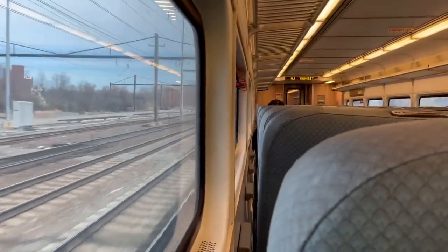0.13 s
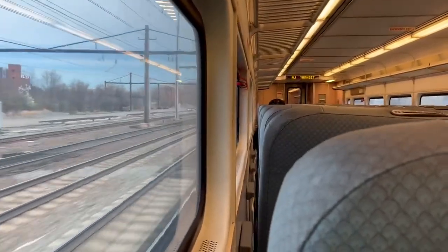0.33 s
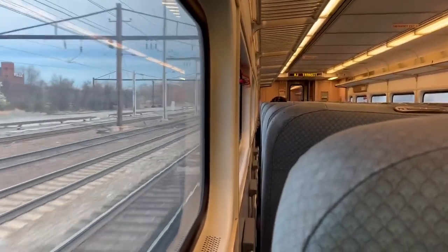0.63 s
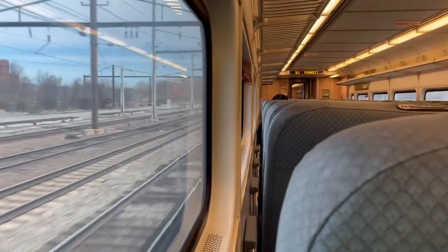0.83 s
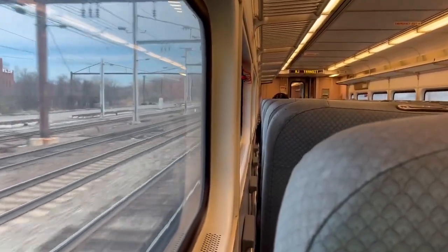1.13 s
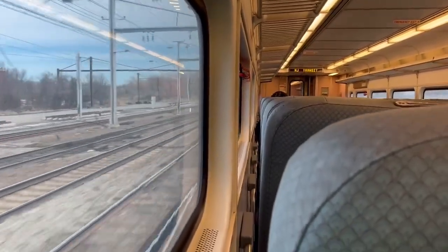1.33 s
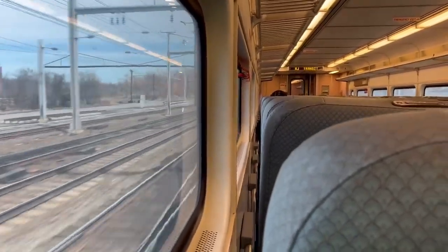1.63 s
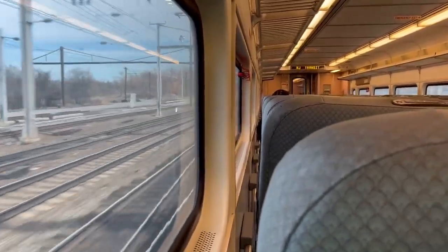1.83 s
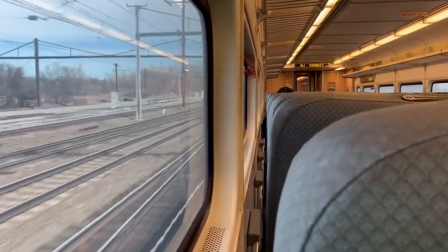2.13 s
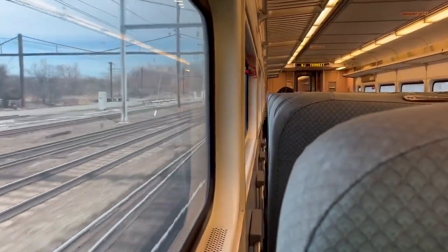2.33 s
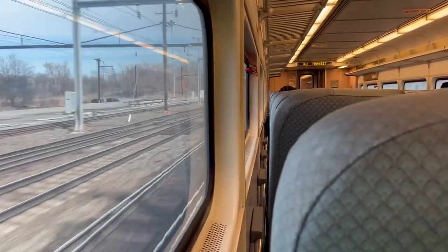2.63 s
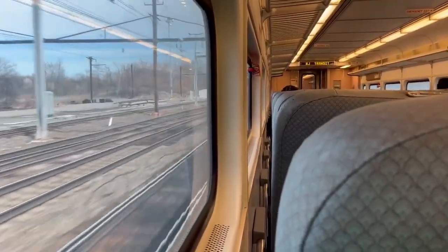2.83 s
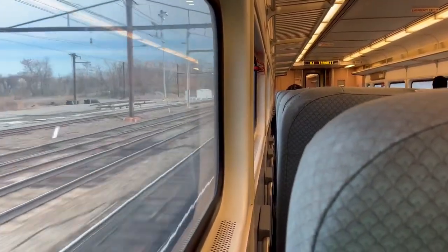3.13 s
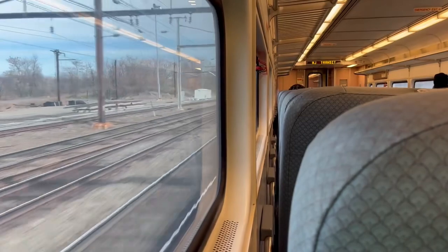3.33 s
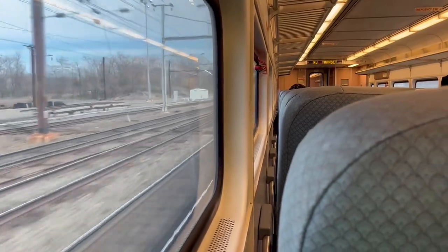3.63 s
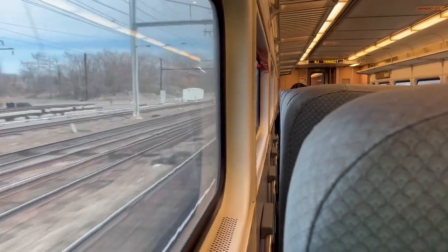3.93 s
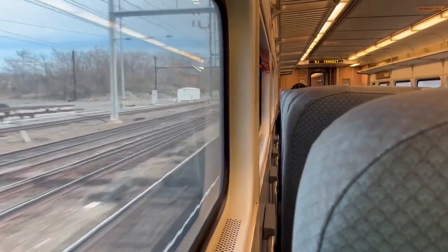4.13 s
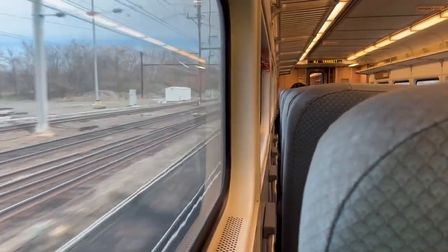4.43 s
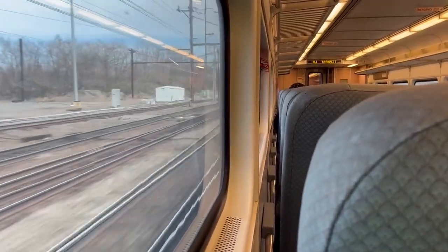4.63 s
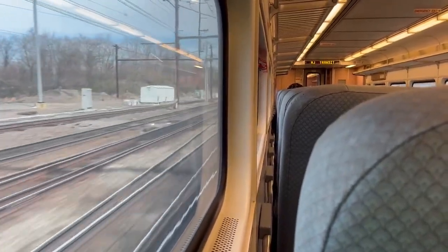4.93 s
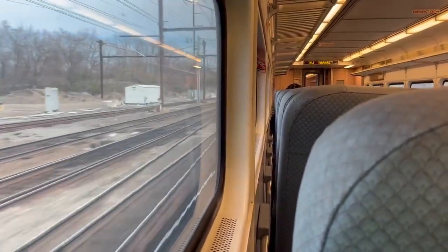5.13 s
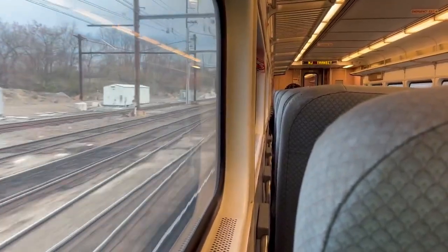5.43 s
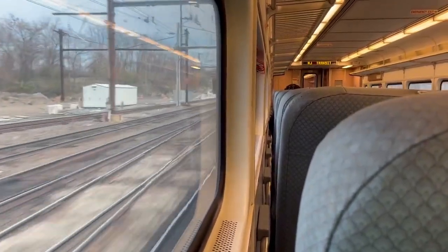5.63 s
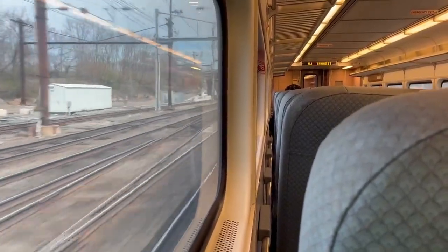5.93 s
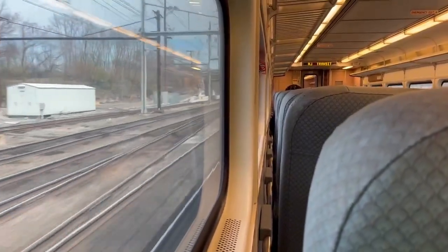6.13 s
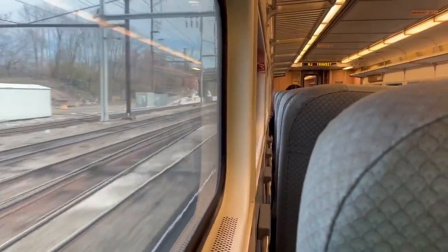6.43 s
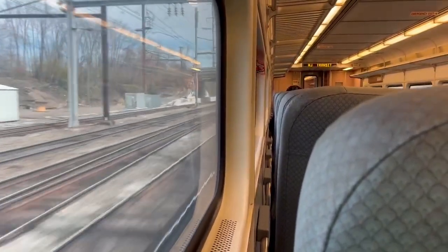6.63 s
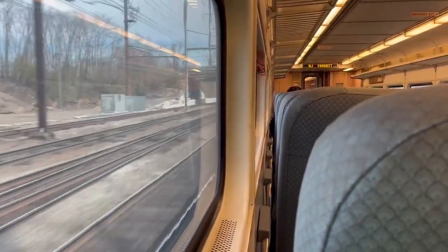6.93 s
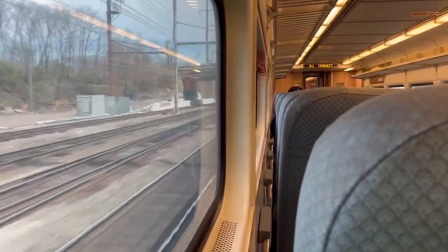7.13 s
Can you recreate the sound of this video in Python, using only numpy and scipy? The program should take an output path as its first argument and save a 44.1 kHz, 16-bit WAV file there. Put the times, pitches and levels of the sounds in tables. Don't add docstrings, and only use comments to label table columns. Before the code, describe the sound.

Inside a moving train coach, deep floor rumble and rolling wheel noise, with thudding rail joints and bursts of steel clatter over switches, thinning later.

```python
import sys
import numpy as np
from scipy import signal
from scipy.fft import rfft, irfft, next_fast_len
from scipy.io import wavfile
from scipy.ndimage import uniform_filter1d, map_coordinates

SR = 44100
rng = np.random.default_rng(int(sys.argv[2]) if len(sys.argv) > 2 else 0)


def generate_wav(signal):
    frames = np.transpose(np.atleast_2d(signal))
    scaled = np.clip(frames, -1, 1) * 32767
    pcm = np.round(scaled).astype(np.int16)
    wavfile.write(sys.argv[1], SR, pcm)


def volts_from_decibels(level):
    exponent = np.asarray(level, float) / 20
    return 10 ** exponent


N = 321489


def unit(x):
    return x / np.sqrt(np.mean(x ** 2) + 1e-20)


def along(curve, hz):
    f, value = np.transpose(curve)
    return np.interp(np.log(hz + 1), np.log(f + 1), value)


def gain(spectrum):
    return lambda hz: volts_from_decibels(along(spectrum, hz)) * (hz >= spectrum[0][0]) * (hz <= spectrum[-1][0])


def filtered(x, response):
    m = next_fast_len(N + SR // 2)
    hz = np.fft.rfftfreq(m, 1 / SR)
    return irfft(rfft(x, m) * response(hz), m)[..., :N]


def wobble(rate_hz):
    knots = rng.standard_normal(2000)
    return map_coordinates(knots, [np.arange(N) * min(rate_hz, 200) / SR])


def patchy(patchy_db):
    z = signal.stft(rng.standard_normal((2, N)), nperseg=512)[2]
    field = uniform_filter1d(rng.standard_normal(z.shape[1:]), size=6, axis=0)
    field = uniform_filter1d(field, size=10, axis=1)
    return signal.istft(z * volts_from_decibels(patchy_db * unit(field)), nperseg=512)[1][:, :N]


def sparse(spread_db):
    z = signal.stft(rng.standard_normal((2, N)), nperseg=1024)[2]
    field = uniform_filter1d(rng.standard_normal(z.shape), size=3, axis=1)
    field = uniform_filter1d(field, size=3, axis=2)
    return signal.istft(z * volts_from_decibels(spread_db * unit(field)), nperseg=1024)[1][:, :N]


def spread(pair, centre, sideways, side_db):
    # f/Hz, share/1
    lean = [(60, .5), (200, 0.85), (370, 0.59), (670, 0.18), (1230, -0.22), (2240, 0.096), (4100, 0.64),
            (7000, 0.55), (10000, .01)]
    # f/Hz, share/1
    lead = [(200, .02), (500, .15), (800, -.25), (1230, -.15), (1800, .15), (2900, .2), (4500, .25),
            (5600, -.15), (9000, -.05)]
    tied = lambda hz: along(lean, hz) + 1j * along(lead, hz)
    free = lambda hz: np.sqrt(np.clip(1 - np.abs(tied(hz)) ** 2, 0, 1))
    mid = unit(filtered(pair[0], centre))
    side = filtered(pair[0], lambda hz: sideways(hz) * tied(hz))
    side += filtered(pair[1], lambda hz: sideways(hz) * free(hz))
    return mid + volts_from_decibels(side_db) * unit(side) * np.array([[1], [-1]])


def swells(s, fade_ms, rise_share, order):
    away_ms = (np.arange(0, N, 64) / SR - np.c_[s]) * 1000
    away = away_ms / np.maximum(np.c_[fade_ms], 10)
    return -10 * np.where(away < 0, -away / rise_share, away) ** order


def summed(rows_db, rest_db):
    power = np.sum(volts_from_decibels(rows_db) ** 2, axis=0) + volts_from_decibels(rest_db) ** 2
    return np.interp(np.arange(N), np.arange(0, N, 64), 10 * np.log10(power))


def rounded(rows, rest_db):
    s, db, fade_ms = np.transpose(rows)
    return summed(np.c_[db] + swells(s, fade_ms, rise_share=0.94, order=2), rest_db)


def crossings(layer, rest_db):
    # t/s, rattle level/dB, knock above it/dB, sizzle above it/dB,
    # time to lose 10 dB/ms
    passes = [(0.003, -47.5, 9.5, -14.0, 86), (0.24, -34, 5.5, -15, 207), (0.329, -36.5, 6.5, -17, 170.0),
              (0.519, -35.5, 7, -17, 154), (0.73, -41.6, 5.5, -17.9, 311), (0.999, -39, 0.5, -15.5, 168.0),
              (1.175, -40, 7, -15.5, 220.0), (1.411, -30, 5.0, -11.4, 79), (1.446, -29.5, 3, -16.9, 166.0),
              (1.623, -36.9, 7.5, -28, 110.0), (1.705, -27, 1.6, -19, 112.0), (2.229, -39, 5, -19.5, 361),
              (2.44, -36.5, 2.5, -17.5, 211), (2.629, -35, 1.5, -15, 147), (2.96, -31, -0.2, -15.2, 172.0),
              (3.256, -35, 1, -16, 131), (3.67, -40.5, 10, -19, 111), (3.867, -39.5, 6.5, -19.5, 460),
              (4.125, -41.5, 9.5, -17, 117.0), (4.323, -42, 5.5, -18, 90), (5.636, -40, 8, -18, 246.0),
              (5.821, -41.5, 8.5, -17, 189.0), (5.987, -40.9, 6.5, -18, 95.0), (6.242, -45, 3.1, -18.5, 158),
              (0.165, -49, 4, -8, 80), (2.135, -58, 3, -6.5, 120), (3.34, -40.5, 3, -14.5, 80),
           (3.76, -47, 8, -18, 100), (3.975, -42, 6, -18, 100), (4.18, -49, 5, -19, 50),
           (4.61, -58.5, 3.3, -5, 150), (4.75, -53, 5, -14, 120), (5.0, -51.5, 8.7, -17, 250),
           (6.8, -54, 6, -18, 150), (7.02, -59, 5.5, -16, 200)]
    s, db, knock_db, sizzle_db, fade_ms = np.transpose(np.array(passes))
    above_db = {"rattle": 0, "knock": knock_db, "sizzle": sizzle_db}[layer]
    return summed(np.c_[db + above_db] + swells(s, fade_ms, rise_share=0.34, order=1), rest_db)


def steadied(x, least_power, share):
    swing = np.sqrt(np.abs(uniform_filter1d(x.mean(0) ** 2, size=3000)) + least_power)
    return unit(x / swing ** share)


def body():
    # t/s, boom level/dB, time to lose 10 dB/ms
    heaves = [(-0.04, -17.5, 182.0), (0.322, -17, 170.0), (0.798, -20.1, 541.0), (0.882, -14.5, 38),
              (1.445, -14.5, 36), (1.639, -21, 168.0), (1.753, -13.5, 39), (1.868, -16.5, 49.0),
              (2.047, -19, 86.0), (2.239, -17.5, 35.0), (2.383, -18, 106.0), (2.586, -26.5, 284.0),
              (2.961, -12.8, 79.0), (3.329, -14.5, 211.0), (3.659, -21.5, 53.0), (3.972, -25, 839.0),
              (4.108, -21, 39.0), (4.294, -21.5, 56.0), (4.645, -19, 45.0), (4.923, -19, 135.0),
              (5.096, -16, 56.0), (5.246, -20, 61.0), (5.479, -19, 30.0), (5.592, -24, 46.0),
              (5.862, -18, 119.0), (6.121, -22, 117.0), (6.413, -17, 85.0), (6.814, -20, 445.0),
              (7.054, -17.5, 34.0), (7.247, -14, 39)]
    # t/s,
    # drumming level/dB, time to lose 10 dB/ms
    shudders = [(0.114, -22, 35.5), (0.493, -22.5, 195.0), (0.693, -18, 97.0), (0.762, -18.5, 1456),
                (1.21, -13.9, 156), (1.516, -15.5, 154.0), (1.793, -16.3, 119.5), (2.126, -17, 35.0),
                (2.269, -14, 95), (2.401, -18, 388.0), (2.506, -20, 42.0), (2.934, -21, 44),
                (3.154, -20.0, 146), (3.686, -17, 53.0), (3.783, -17, 33), (3.834, -23.5, 1033.0),
                (4.034, -23, 40.0), (4.131, -22.1, 32.0), (4.266, -25.5, 124.0), (4.768, -28, 51),
                (5.001, -23, 171.0), (5.732, -21, 404.0), (5.8, -29, 37.0), (6.154, -23, 43.0),
                (6.341, -30.5, 244.0), (6.706, -24.5, 46.0), (6.884, -27.5, 172.0), (7.128, -26, 40),
                (7.3, -28, 158.0)]
    # f/Hz, width/Hz, level/dB
    modes = [(32, 14, -23), (50, 10, 0), (58.4, 7.6, 16), (87, 45, -22)]
    # f/Hz, level/dB
    panel = [(50, -45), (85, -1), (146, 0), (205, -6.5), (253, -15.5), (300, -13), (390, -38.5),
             (660, -120)]

    def ring(f):
        modal = sum(volts_from_decibels(db) * 1j * f * w / (c * c - f * f + 1j * f * w) for c, w, db in modes)
        return modal / (1 + (f / 120) ** 4)

    boom = spread(rng.standard_normal((2, N)), ring, ring, side_db=-27.5)
    boom = steadied(boom, least_power=0.054, share=0.85)
    drum = spread(rng.standard_normal((2, N)), gain(panel), gain(panel), side_db=-19.0)
    drum = steadied(drum, least_power=0.05, share=0.74)
    boom_db = rounded(heaves, rest_db=-27) + 0.5
    drum_db = rounded(shudders, rest_db=-34) - 0.3
    return volts_from_decibels(boom_db) * boom + volts_from_decibels(drum_db) * drum


def wheels():
    # t/s, level/dB
    rolling = [(0.0, -32), (0.43, -27.5), (1.12, -30.5), (1.3, -28), (1.58, -29.5), (1.91, -31.5),
               (2.11, -32.5), (2.33, -29), (3.47, -32), (3.92, -30.5), (5.36, -31.5), (5.81, -29.5),
               (6.21, -31.5), (7.29, -30)]
    # f/Hz, level/dB
    roll = [(130, -28), (220, -1.5), (380, -4.5), (500, -8), (535, -11.5), (800, -13), (1260, -18),
            (1560, -23.5), (1890, -22), (3000, -29), (4500, -33), (6000, -44.5), (7700, -54), (8100, -84)]
    # f/Hz, level/dB
    roll_side = [(59, -39), (100, -31), (203, -6), (339, -1), (366, -3), (502, -3.5), (635, -3), (923, -4),
                 (1260, -14.5), (1600, -10), (1910, -19), (4200, -26.5), (11000, -51.5), (14300, -82),
                 (22000, -120)]
    s, db = np.transpose(rolling)
    roll_db = np.interp(np.arange(N) / SR, s, db)
    knock_rest_db = -40
    load_db = 0.29 * (crossings("knock", knock_rest_db) - knock_rest_db)
    noise = spread(patchy(patchy_db=1.14), gain(roll), gain(roll_side), side_db=-4.5)
    return volts_from_decibels(roll_db + load_db + 1.28) * noise


def points():
    # f/Hz, level/dB
    knock_mid = [(500, -30), (900, -1.5), (1500, -1.5), (2000, -4), (2800, -4.5), (3600, -25)]
    # f/Hz, level/dB
    knock_side = [(500, -28.5), (900, -3.5), (1500, -0.5), (2000, -7), (2800, -9), (3600, -41)]
    # f/Hz, level/dB
    rattle_mid = [(1500, -7), (2200, -8), (3200, -1.5), (4500, -1.5), (5500, -6), (6500, -12),
                  (7600, -20.5), (8000, -49)]
    # f/Hz, level/dB
    rattle_side = [(1500, -45), (2200, -9), (3200, -3), (4500, -0.5), (6000, -12), (8500, -8), (10500, -24),
                   (11500, -42.5)]
    # f/Hz, level/dB
    sizzle_mid = [(8800, -17), (9500, -3.5), (11000, -2), (12500, -6.5), (13800, -13), (14500, -31)]
    # f/Hz, level/dB
    sizzle_side = [(9000, -7), (10500, -11), (11000, -34), (12900, -33), (13400, -10), (14500, -2),
                   (15500, -6)]
    contacts = volts_from_decibels(0.94 * wobble(150) + 0.61 * wobble(12))
    knock = spread(contacts * patchy(patchy_db=1.0), gain(knock_mid), gain(knock_side), side_db=-1.5)
    rattle = spread(contacts * patchy(patchy_db=1.5), gain(rattle_mid), gain(rattle_side), side_db=-1.0)
    sizzle = spread(contacts * sparse(spread_db=4), gain(sizzle_mid), gain(sizzle_side), side_db=-8)
    out = volts_from_decibels(crossings("knock", rest_db=-55) - 1.5) * knock
    out += volts_from_decibels(crossings("rattle", rest_db=-62) + 1.3) * rattle
    return out + volts_from_decibels(crossings("sizzle", rest_db=-72) + 0.56) * sizzle


def coach(x):
    # f/Hz, width/Hz, lift/dB
    waves = [(334.5, 24, 3), (464.5, 20, 4.5), (630, 18, 0), (793, 36, 2), (972, 16, 0), (1394, 49, 3),
             (1540, 96, 4.5), (1930, 35, -4.5), (2560, 48, -7.5), (2670, 66, -3.5), (3050, 46, 2),
             (3620, 25, 2)]
    knots = rng.standard_normal((2, 1000))
    ripple = lambda f: 1.1 * np.array([map_coordinates(k, [f / 28]) for k in knots]) * (f > 500)
    lift = lambda f: sum(db / (1 + (2 * (f - c) / w) ** 2) for c, w, db in waves)
    return filtered(x, lambda f: volts_from_decibels(lift(f) + ripple(f)))


def vent():
    centre_hz, width_hz = 1570, 120
    note = lambda f: (1j * f * width_hz / (centre_hz ** 2 - f * f + 1j * f * width_hz)) ** 2
    return volts_from_decibels(-48.5) * spread(rng.standard_normal((2, N)), note, note, side_db=-2.5)


def joints():
    # t/s, peak level/dB, floor note f/Hz
    gaps = [(0.105, -6.5, 201), (0.199, -10.5, 211), (0.292, -5, 96.5), (0.4, -9.5, 192),
            (0.524, -6, 135.7), (0.601, -6, 195), (0.681, -9.5, 123), (1.156, -12, 128), (2.114, -9.5, 98),
            (2.242, -2, 154), (2.589, -22, 120), (3.18, -10, 108), (3.399, -25, 102), (3.669, -10.5, 144),
            (4.012, -10, 170.5), (4.119, -8, 178), (4.48, -17, 108), (4.936, -19, 121), (5.199, -2, 111),
            (5.484, -11.5, 243), (5.767, -10, 98), (6.8, -17, 119)]
    out, t = np.zeros(N + SR), np.arange(SR // 4) / SR
    for s, db, hz in gaps:
        decay = volts_from_decibels(db - 2 - 60 * t / 0.17)
        onset = 1 - np.exp(-t / 0.0032)
        out[round(s * SR):][:len(t)] += decay * onset * np.sin(2 * np.pi * hz * t)
    return out[:N] * volts_from_decibels([[0.9], [-0.9]])


def ticks():
    # t/s, peak level/dB
    cracks = [
        (1.678, -38),
        (2.122, -40),
        (2.935, -46),
    ]
    out, t = np.zeros((2, N + SR)), np.arange(SR // 20) / SR
    for s, db in cracks:
        start = round(s * SR)
        decay = volts_from_decibels(db - 60 * t / 0.036)
        out[:, start:start + len(t)] += decay * rng.standard_normal((2, len(t)))
    return filtered(out[:, :N], lambda hz: 1 / (1 + (5000 / (hz + 1)) ** 4))


def squeals():
    # t/s, time to lose 10 dB/ms, f/Hz, level/dB, octave level/dB
    rubs = [(2.04, 10, 3205, -40, -75), (2.075, 14, 3208, -32.5, -70), (2.14, 22, 3205, -41, -75),
            (2.1, 22, 2234.5, -44, -50), (2.142, 28, 2234.5, -34, -33), (2.182, 26, 2234.5, -32, -43),
            (2.218, 20, 2234.5, -41, -39), (2.256, 28, 2234.5, -36, -60), (2.278, 15, 2234.5, -42, -34),
            (2.315, 30, 2234.5, -47, -41), (3.64, 40, 2135, -42, -66), (3.715, 40, 2140, -39, -61),
            (4.505, 25, 2400, -42, -65)]
    out, t = np.zeros((2, N)), np.arange(N) / SR
    flutter = np.array([wobble(42), wobble(44.8)])
    drift = np.array([wobble(22.2), wobble(21.8)])
    for s, fade_ms, hz, db, octave_db in rubs:
        on = np.abs(t - s) < fade_ms / 500
        rub_db = -10 * ((t[on] - s) * 1000 / fade_ms) ** 2
        turn = 2 * np.pi * hz * t[on] + 0.15 * drift[:, on]
        note = volts_from_decibels(db + rub_db + flutter[:, on]) * np.sin(turn + np.array([[0.4], [-0.4]]))
        octave_level = volts_from_decibels(octave_db + rub_db + 1.2 * flutter[::-1, on])
        octave = octave_level * np.sin(2 * turn + np.array([[0.3], [-0.3]]))
        out[:, on] += np.sqrt(2) * (note + octave)
    return out * volts_from_decibels([[1.2], [-1.2]])


def scene():
    return body() + coach(wheels() + points()) + vent() + joints() + ticks() + squeals()


def top_cut(x):
    return signal.sosfilt(signal.butter(12, 14320, fs=SR, output="sos"), x)


def record(dry):
    soft = dry / (1 + np.abs(dry / 1.1) ** 4) ** (1 / 4)
    return top_cut(soft)


dry = scene()
out = record(dry)
generate_wav(out)
```